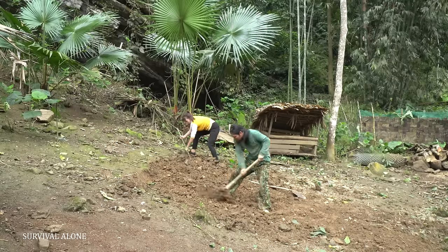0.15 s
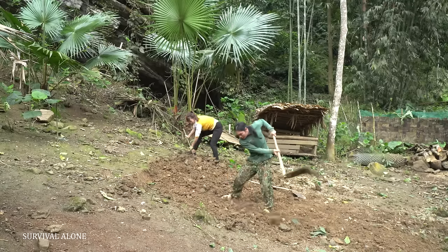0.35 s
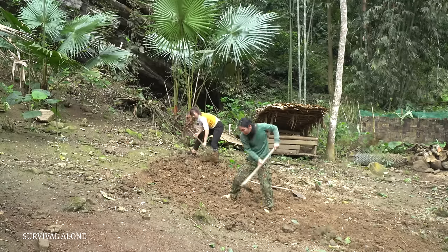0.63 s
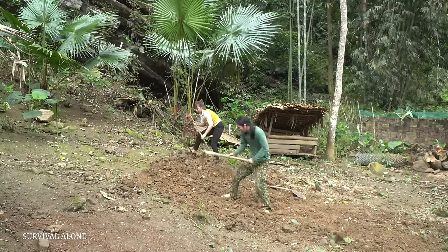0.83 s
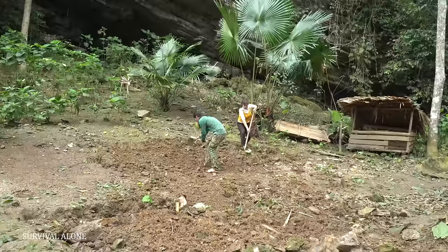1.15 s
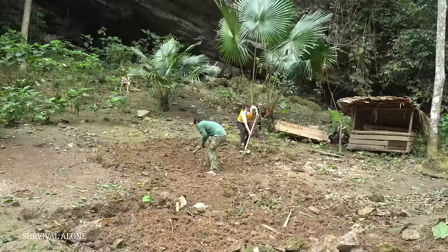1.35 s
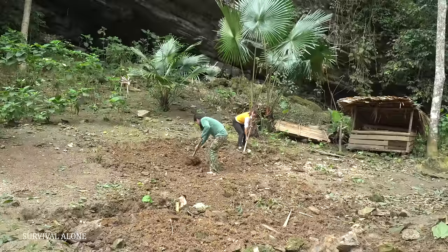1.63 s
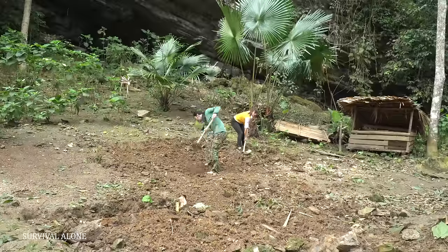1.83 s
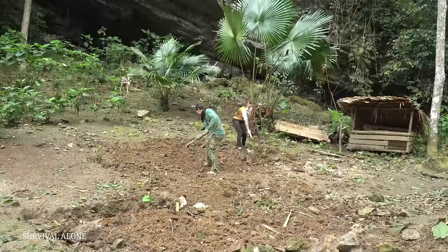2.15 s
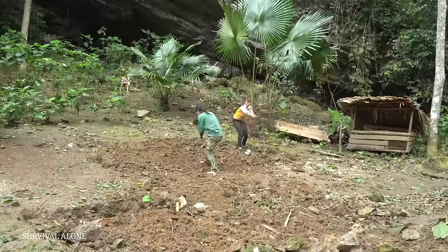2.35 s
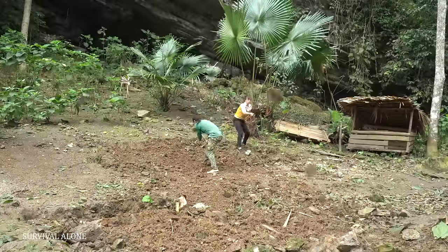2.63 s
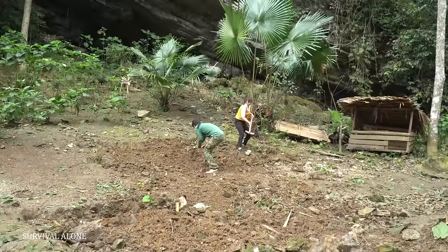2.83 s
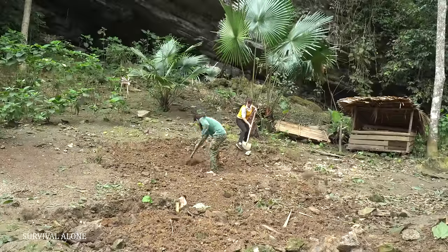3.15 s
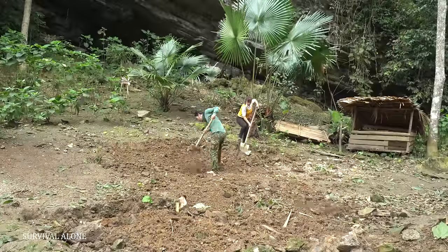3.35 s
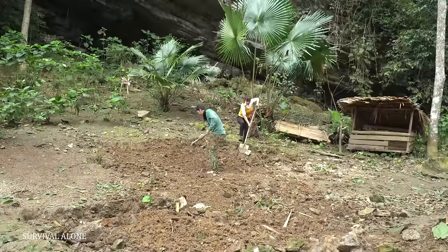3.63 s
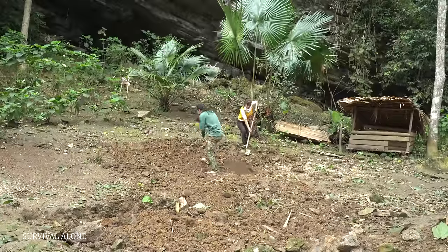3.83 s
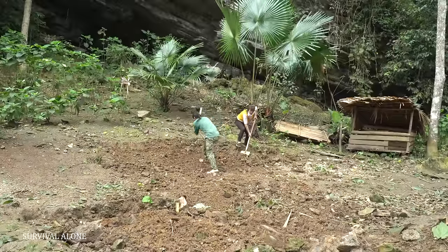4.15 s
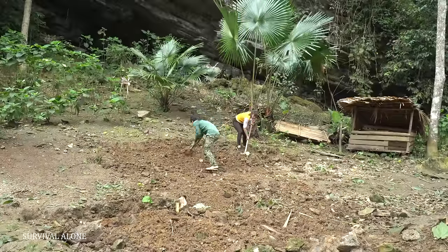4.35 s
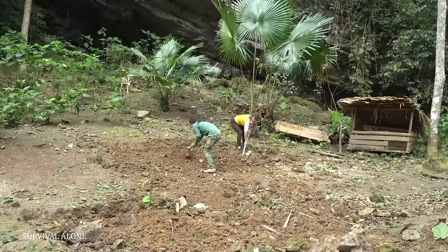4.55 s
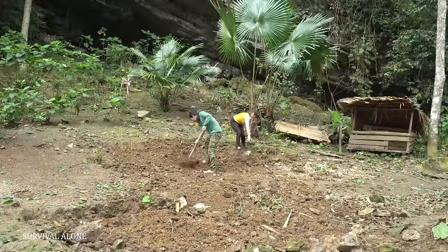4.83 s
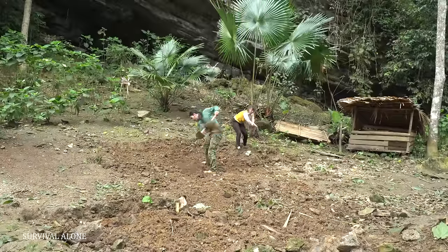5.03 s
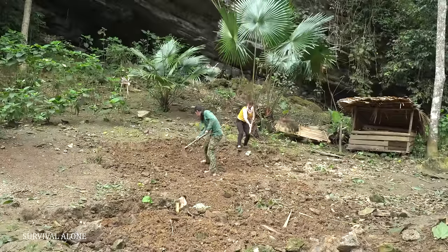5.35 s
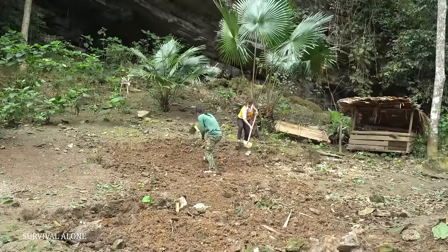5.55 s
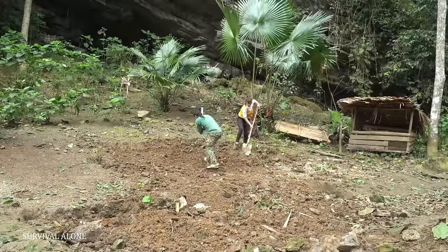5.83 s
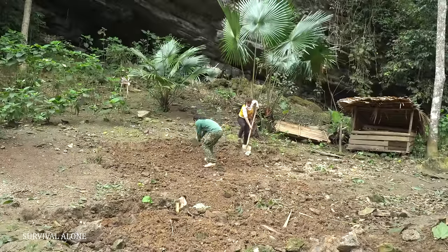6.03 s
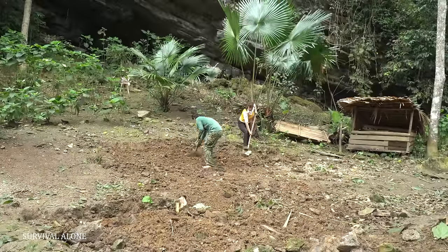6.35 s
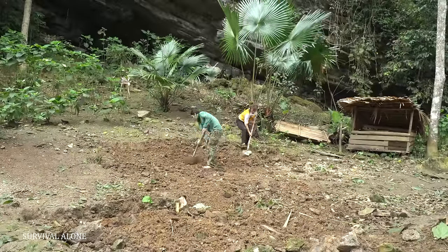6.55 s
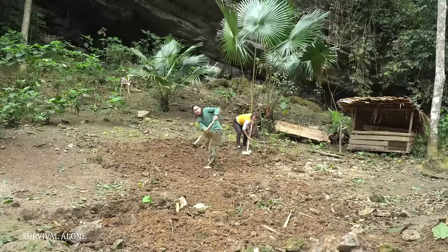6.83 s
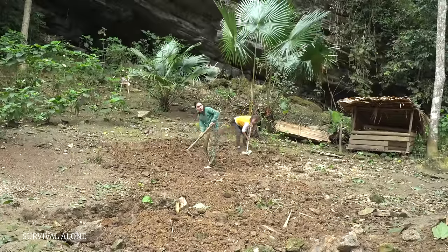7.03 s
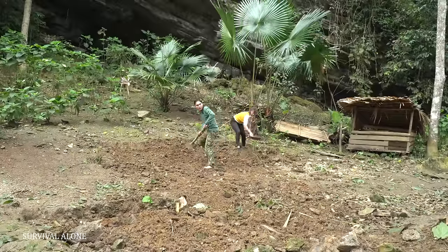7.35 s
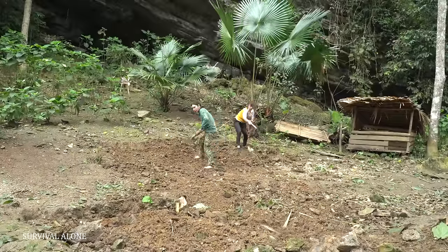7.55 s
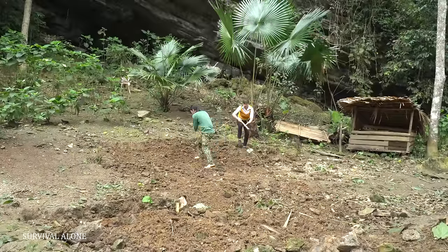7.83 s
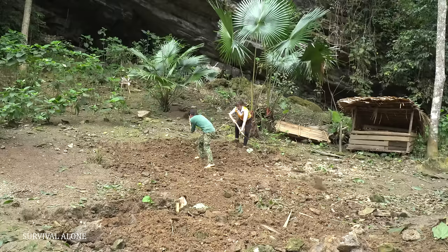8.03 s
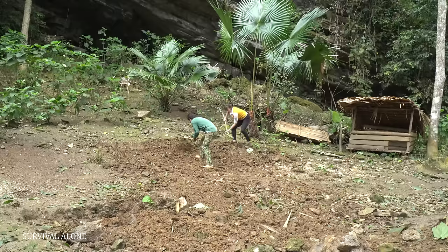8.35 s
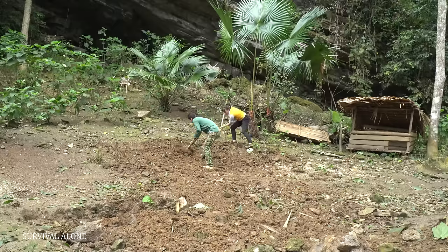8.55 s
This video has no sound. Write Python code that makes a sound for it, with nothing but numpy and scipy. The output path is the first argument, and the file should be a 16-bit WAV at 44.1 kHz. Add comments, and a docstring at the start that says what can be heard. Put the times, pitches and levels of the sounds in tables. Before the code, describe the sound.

Quick crunches open the scene, then looser strokes, dirt sweeps and pebble ticks. After a lull come hard bites with ringing steel, then a crowded flurry of crunches, stone knocks and a clear stone chime. It thins to trickling grit and faint hoe swishes before final blows. Sound is close and dry, left-heavy, hardest hits slightly clipped, with a faint rock echo and steady forest hiss.

```python
"""Two people hoe dry, stony ground in a forest clearing, over a steady, quiet forest hiss.
From the start blades crunch in (noise bursts) with dull tails (many tiny grains), and pebbles tick (snaps).
Soon earth is dragged and tossed, clods thud and stones knock (damped tones), and steel rings (modes).
A soft gust rumbles by early on; later a flat stone chimes, then swung hoes swish (wavering notes).
Trees and a rock face send back the strokes (filtered noise tails); stray grit trickles throughout."""
import sys
import numpy as np
from scipy import signal
from scipy.fft import rfft, irfft
from scipy.io import wavfile
from scipy.ndimage import uniform_filter1d

SR = 44100
rng = np.random.default_rng(int(sys.argv[2]) if len(sys.argv) > 2 else 0)


def dump(signal):
    """Clip the signal to [-1, 1] and save it as 16-bit WAV at the path in sys.argv[1]."""
    limited = np.clip(np.atleast_2d(signal).T, -1, 1)
    pcm = np.round(limited * 32767).astype(np.int16)
    wavfile.write(sys.argv[1], SR, pcm)


N = 383229  # length in samples

# In all tables level/dB is relative: the function that plays the table may add a gain to all its rows.


def amp(db):
    """Turns decibels into a gain."""
    return 10 ** (np.asarray(db) / 20)


def unit(x):
    """Scales a signal to an rms of 1."""
    return x / np.sqrt(np.mean(x ** 2) + 1e-20)


def read(points, hz):
    """Reads a spectrum between its points, on a log-frequency axis."""
    f, value = np.transpose(points)
    return np.interp(np.log(hz + 1), np.log(f), value)


def add(mix, s, sound):
    """Adds a sound into the mix from time s on."""
    part = mix[max(round(s * SR), 0):][:len(sound)]
    part += sound[:len(part)]


def bell(hz, centre_hz, octaves):
    """Gain of a broad hump that has halved this many octaves from its centre."""
    return 1 / (1 + (np.log2((hz + 1) / centre_hz) / octaves) ** 2)


def click(gain):
    """Makes the click that has a given spectrum and starts at once, with no sound before it."""
    both_sides = np.r_[gain, gain[-2:0:-1]]
    log_gain = np.log(np.maximum(both_sides, 1e-5))
    return np.fft.ifft(np.exp(np.conj(signal.hilbert(log_gain)))).real


def tint(x, points):
    """Colours a signal with a spectrum and scales it to an rms of 1."""
    taps = click(amp(read(points, np.fft.rfftfreq(2048, 1 / SR))))
    return unit(signal.oaconvolve(x, taps)[:N])


def stone(hz, centre_hz, octaves, ripple_db):
    """Spectrum of a struck stone: a broad hump with a few mild resonances of its own."""
    ripple = np.tanh(unit(uniform_filter1d(rng.standard_normal(len(hz)), size=9)))
    return bell(hz, centre_hz, octaves) * amp(ripple_db * ripple * bell(hz, centre_hz, 0.97))


# blade crunching into the ground: (t/s, level/dB, centre f/Hz, weight of soil level/dB, capped at 0)
CHOPS = [(0.078, -11, 2570, 3), (0.145, -14.5, 2250, -23), (0.195, -6.5, 2400, 2), (0.23, -5, 2700, -32),
         (0.247, -0.5, 3020, -36), (0.26, -7.5, 2930, -36), (1.32, -12, 3760, 4), (1.3822, -4, 1410, -9),
         (1.392, -4, 1420, 4), (1.522, -9.5, 2660, -19), (1.667, -5.5, 1600, -6), (1.779, -4, 2740, -4.5),
         (2.425, -13, 870, -4), (2.567, -8, 1710, -5), (2.688, -11.5, 2110, 3), (2.827, -4, 1220, -33),
         (2.879, -7.5, 2080, 0), (3.092, -12, 2570, 2), (3.145, -10, 1700, -40), (3.21, -5.5, 2380, -10),
         (3.382, -11, 5100, -2.5), (3.472, -14.5, 1660, -3), (4.389, -1, 1280, -23),
         (4.3885, -8.5, 6400, -28), (4.408, -4.5, 1400, -22), (4.696, -12.5, 1900, -3),
         (4.7916, -3, 2400, -29), (4.865, -11.5, 2720, -16), (5.059, -14, 2210, -31),
         (5.19, -12.5, 2860, -17), (5.365, -17.5, 1900, 2), (5.765, -1.5, 1160, -20), (5.87, -6, 2570, -4),
         (5.921, -5.5, 1020, -33), (5.981, -3, 1040, -31), (6.162, -0.5, 1560, 1), (6.31, -1.5, 1450, -4),
         (6.365, -6, 1480, -9), (6.416, -10.5, 1530, 3), (6.4405, -5, 900, -5), (6.474, -5.5, 3330, -5),
         (6.543, -9, 3530, -32), (6.652, -3, 2390, -13), (7.652, -11.5, 3500, -5), (8.242, -12, 2760, -22),
         (8.247, -0.5, 1580, -11.5), (8.529, -8, 2100, -7), (8.571, -14, 1070, -30)]


def chops(level_db=-5.5, rise_s=0.0023, t60_s=0.026, octaves=1.04, soil_hz=310, soil_db=2.0,
          crumble_db=-22, crumble_t60_s=0.37, muffle_hz=9200, uneven_db=4.0):
    """The edge bites, the crust breaks in a run of tiny fractures, then crumbles."""
    out, t = np.zeros(N), np.arange(8192) / SR
    hz = np.fft.rfftfreq(1024, 1 / SR)
    for s, db, centre_hz, weight_db in CHOPS:
        crack, crumble, size = rng.standard_normal((3, len(t)))
        envelope = np.clip(t / rise_s, 0, 1) ** 2 * amp(-60 * np.maximum(t - rise_s, 0) / t60_s)
        fractures = amp(uneven_db * unit(uniform_filter1d(size, size=24)))
        crumbs = amp(crumble_db - 60 * t / crumble_t60_s) * crumble * abs(size)
        burst = crack * envelope * fractures + crumbs
        muffle = np.hypot(1, (hz / muffle_hz) ** 2)  # earth soaks up the top
        crust = stone(hz, centre_hz, octaves, ripple_db=5) / muffle
        soil = amp(soil_db + min(weight_db, 0)) * bell(hz, soil_hz, 1)
        sound = signal.fftconvolve(burst, click(np.hypot(crust, soil)))
        loudness = np.linalg.norm(envelope) / np.linalg.norm(sound)
        add(out, s, amp(db + level_db) * sound * loudness)
    return out


def ring(modes, contact_hz, octaves, rub):
    """Decaying modes; the contact decides which speak most, and rubbing grit blurs their pitch."""
    t = np.arange(SR // 2) / SR
    hz, db, t60 = np.transpose(modes)[:, :, None]
    start = 2 * np.pi * rng.random(hz.shape)
    wander = np.cumsum(rng.standard_normal((len(modes), len(t))), axis=1)
    phase = start + rub * np.sqrt(hz / hz.mean()) * wander
    strength = amp(db - 60 * t / t60) * bell(hz, contact_hz, octaves)
    partials = strength * np.sin(2 * np.pi * hz * t + phase)
    return partials.sum(0) * (1 - np.exp(-t / 0.00013))  # very short soft start


# steel blade glancing off a stone:
# (t/s, level/dB, f/Hz that the contact favours, pitch factor from the load on the blade, how it rings)
CLANGS = [(1.78, -34, 2870, 0.9, "dull"), (4.39, -22.5, 7500, 0.97, "edge"),
          (4.794, -33.5, 2570, 1.0, "dull"), (5.059, -17.5, 1990, 0.98, "clear"),
          (6.653, -22.5, 3420, 1.0, "dull"), (8.251, -37, 5600, 0.85, "edge")]
# the blade's ringing modes for each way it rings: (f/Hz before the pitch factor, level/dB, t60/s)
BLADES = {"dull": [(1510, 3, .55), (2500, 1, .55), (2760, -1, .45), (3880, -3, .35), (4450, 1, .4),
          (6400, -3, .25)], "clear": [(1507, -1, .17), (2196, 3, .08), (3192, -4, .12), (3634, 2, .11)],
          "edge": [(6240, -4, .6), (7080, 0, .8), (8200, -4, .75), (9060, -7, .7)]}


def blades(level_db=-6):
    """The steel rings on after contact; grit on the blade roughens the note."""
    out, rub = np.zeros(N), {"dull": .09, "clear": .06, "edge": .17}
    for s, db, contact_hz, pitch, blade in CLANGS:
        modes = np.multiply(BLADES[blade], [pitch, 1, 1])
        add(out, s, amp(db + level_db) * ring(modes, contact_hz, octaves=1.0, rub=rub[blade]))
    return out


# a hard, flat stone is knocked about: (t/s, level/dB, f/Hz that the contact favours)
CHIMES = [(6.003, -3.5, 6060), (6.008, -9, 1400), (6.022, -14.5, 3560), (6.146, -16.5, 6860)]
# ringing modes of that stone: (f/Hz, level/dB, t60/s)
SLAB = [(1437, -2.5, 0.42), (3561, 3, 0.22), (6290, 0.5, 0.075), (6450, -14, 0.4), (9650, -6, 0.06)]


def slab(level_db=-4):
    """The flat stone chimes in its own modes each time it is knocked."""
    out = np.zeros(N)
    for s, db, contact_hz in CHIMES:
        add(out, s, amp(db + level_db) * ring(SLAB, contact_hz, octaves=0.4, rub=0.05))
    return out


# single pebbles snapping against each other: (t/s, level/dB, centre f/Hz)
PEBBLES = [(0.014, -4.5, 3300), (0.52, -13, 2540), (0.83, -11.5, 7900), (0.9075, -8, 4260),
           (0.926, -10.5, 4120), (0.944, -10, 5500), (1.009, -13.5, 3780), (1.199, -24, 3000),
           (1.437, -5.5, 3900), (1.53, -7.5, 3600), (1.551, -8.5, 3500), (1.715, -5, 4800),
           (2.167, -14, 8900), (2.171, -6.5, 3520), (2.274, -11, 1170), (2.285, -10.5, 3220),
           (2.3193, -15, 8900), (2.4257, -11, 7550), (2.55, -12, 3000), (2.576, -1, 5000),
           (2.79, -1.5, 5260), (2.817, -7, 3600), (2.8287, -3, 3030), (3.047, -4.5, 4750),
           (3.121, -9, 3000), (3.155, -6.5, 3580), (3.237, -7, 1910), (3.614, -16.5, 4460),
           (4.299, -13, 3600), (4.079, -14, 11000), (3.892, -3, 8500), (4.427, -6, 2600),
           (4.764, -10, 3500), (4.8317, -6, 4300), (5.202, -6, 5440), (5.609, -11, 6460),
           (5.896, -3.5, 2950), (6.091, -2.5, 4000), (7.383, -9, 3300), (7.536, -9.5, 7500),
           (7.564, -3.5, 4860), (7.604, -6, 3200), (8.1262, -12.5, 3360), (8.1859, -8, 3260),
           (8.471, -10, 1390)]


def pebbles(level_db=-5, octaves=1.38, chatter=0.094, chatter_t60_s=0.019):
    """One sharp snap with a brief chatter as the pebble settles; both stones colour it."""
    out, t, hz = np.zeros(N), np.arange(1500) / SR, np.fft.rfftfreq(1024, 1 / SR)
    for s, db, centre_hz in PEBBLES:
        snap = t == 0
        contact = snap + chatter * rng.standard_normal(len(t)) * amp(-60 * t / chatter_t60_s)
        two_stones = stone(hz, centre_hz, octaves, ripple_db=5.0) ** 2
        sound = signal.fftconvolve(contact, click(two_stones))
        add(out, s, amp(db + level_db) * sound / abs(sound).max())
    return out


def bumps(rows, rise_s, t60_s, sag, rough):
    """Damped bodies: a few cycles that sag in pitch, roughened by the earth that they press."""
    out, t = np.zeros(N), np.arange(SR // 4) / SR
    for s, db, hz in rows:
        # the pitch starts a little above hz and settles as far below it
        turns = np.cumsum(hz * (1 + sag * (np.exp(-t / rise_s / 3) - .5))) / SR
        spread = bell(np.fft.rfftfreq(len(t), 1 / SR), hz, 1.0) ** 2
        earth_noise = unit(irfft(rfft(rng.standard_normal(len(t))) * spread, len(t)))
        envelope = (1 - np.exp(-(t / rise_s) ** 2)) * amp(-60 * t / t60_s)
        body = np.sin(2 * np.pi * turns) + rough * earth_noise
        add(out, s, amp(db) * envelope / envelope.max() * body)
    return out


# stones rolling over the blade: (t/s, level/dB, middle f/Hz of the sagging pitch)
KNOCKS = [(1.176, -24, 986), (1.476, -24, 1174), (3.474, -20.5, 1308), (4.512, -19.5, 1020),
          (5.924, -20, 964), (5.961, -18.5, 952), (5.985, -14.5, 1012), (6.043, -16.5, 966),
          (6.058, -14, 796), (6.079, -13.5, 867), (6.089, -16, 953), (6.4415, -14, 867)]


def knocks():
    """Rolling stones knock and clink as short tones with hardly any sag."""
    return amp(4.0) * bumps(KNOCKS, rise_s=0.00035, t60_s=0.059, sag=0.0089, rough=0.31)


# heavy clods and boots landing: (t/s, level/dB, middle f/Hz of the sagging pitch)
THUDS = [(1.16, -45, 128), (1.39, -44, 128), (2.767, -30.5, 129), (3.338, -35.5, 127), (6.164, -31, 129),
         (7.221, -33, 135), (7.24, -35.5, 167), (7.255, -41, 91.5), (8.117, -39, 133), (8.19, -41.5, 228)]


def thuds():
    """Clods and boots thud as low tones that sag clearly, with much rough earth."""
    return amp(9.5) * bumps(THUDS, rise_s=0.0004, t60_s=0.12, sag=0.3, rough=0.91)


def grains(colour, per_s, spread_db, clump_db, wash):
    """Countless small impacts of uneven size, falling in clumps over a smooth rustle."""
    size = amp(spread_db * np.minimum(rng.exponential(1, N), 3.6))
    impacts = size * rng.choice([-1., 1.], N) * (rng.random(N) < per_s / SR)
    slow_noise = uniform_filter1d(uniform_filter1d(rng.standard_normal(N), size=400), size=200)
    clumps = amp(clump_db * unit(slow_noise))
    return tint((unit(impacts) + wash * rng.standard_normal(N)) * clumps, colour)


def gravel(per_s=160, spread_db=4.5, cycles=2.7, low_hz=900, high_hz=7500):
    """Small pings of many pitches, like stones of many sizes colliding."""
    out, t = np.zeros(N), np.arange(1024) / SR
    chance = rng.random((N // 100, 3))  # one row for each short time slot
    for slot in np.flatnonzero(chance[:, 0] < per_s * N / SR / len(chance)):
        _, size, pitch = chance[slot]
        hz = low_hz * (high_hz / low_hz) ** pitch
        ping = np.sin(2 * np.pi * hz * t) * np.exp(-t * hz / cycles) * hz ** (1 / 4)
        gain = amp(spread_db * min(-np.log(size), 3))
        add(out, slot / len(chance) * N / SR, gain * ping)
    return unit(out)


def surge(peak_s, swell_s, t60):
    """A power envelope that swells smoothly to 1 and then dies away."""
    out, lead = np.zeros(N), min(np.pi * swell_s, peak_s)
    t = np.arange(-lead, t60, 1 / SR)
    level = np.where(t < 0, np.exp(-(t / swell_s) ** 2), amp(-60 * t / t60))
    add(out, peak_s - lead, level ** 2)
    return out


def clustering(per_s=90, burst_s=0.0021, share=0.71):
    """At random moments the power gathers into bursts a few milliseconds long."""
    t = np.arange(1024) / SR
    starts = 1. * (rng.random(N) < per_s / SR)
    bursts = abs(signal.oaconvolve(starts, t * np.exp(-t / burst_s))[:N])
    return 1 - share + share * bursts / bursts.mean()


# colour of each grain size, from coarse to fine: (f/Hz, level/dB)
CRUMBS = [(35, -23), (95, -5), (300, 0), (600, -1.5), (1050, 2.5), (1500, -1.5), (2600, -52)]
GRIT = [(600, -7.5), (1400, 4.5), (2600, 7), (4200, 4), (6000, -6), (10000, -22)]
DUST = [(3000, 2.5), (6800, 6.5), (9000, 2), (12000, 0), (16000, -8)]


def texture(rows, lumpy, gravel_db=-5.5):
    """Four layers of grains, even or lumpy: crumbs patter, gravel clinks, grit crackles, dust fizzes."""
    flow, coarse, fine = np.zeros((3, N))  # powers of overlapping rows add
    for s, swell_s, db, t60, coarse_db, dust_db in rows:
        power = amp(db) ** 2 * surge(s, swell_s, t60)
        flow += power
        coarse += power * amp(coarse_db) ** 2
        fine += power * amp(dust_db) ** 2
    crumbs = grains(CRUMBS, per_s=450, spread_db=3.0, clump_db=2.8 * lumpy, wash=.5 / lumpy)
    grit = grains(GRIT, per_s=900, spread_db=3.8, clump_db=1.9 * lumpy, wash=.5 / lumpy)
    dust = grains(DUST, per_s=2200, spread_db=3.6, clump_db=1.6 * lumpy, wash=.65 / lumpy)
    mix = np.sqrt(coarse) * (crumbs + amp(gravel_db) * gravel())
    mix += np.sqrt(flow) * grit + np.sqrt(fine) * dust
    return mix * unit(np.sqrt(clustering()) ** lumpy)


# dense, dull tails after hard bites, thrown back by the surroundings:
# (t/s, level/dB, t60/s, coarse layer against middle layer level/dB)
TAILS = [(0, -29.5, 0.88, -7.5), (0.239, -29.5, 0.24, -3.5), (1.508, -29.5, 0.75, -4.5),
         (1.78, -39.5, 1, -9), (2.828, -23, 0.4, -17), (3.481, -34, 0.28, -3.5), (4.405, -25.5, 1.2, -5),
         (4.799, -31.5, 0.77, -11.5), (5.9, -35.5, 1.7, 3.5), (6.16, -29.5, 1.7, -2.5),
         (6.47, -33.5, 1.02, 1), (7.655, -39.5, 0.35, -2), (8.257, -33, 1.22, -3),
         (8.551, -36.5, 0.56, 2.5)]


def tails(rise_s=0.0012, dust_db=-10.5):
    """A sudden, even hiss that dies away after a stroke, made of dense grains with little lumpiness."""
    rows = [(s + rise_s, rise_s, db, t60, coarse_db, dust_db) for s, db, t60, coarse_db in TAILS]
    return texture(rows, lumpy=.5)


# earth dragged by the blade or tossed to the ground: (t/s at its height, swell/s, level/dB, t60/s,
# coarse crumbs against grit level/dB, fine dust against grit level/dB)
SWEEPS = [(.48, 0.096, -41.5, 0.81, 5, 4), (.77, 0.42, -41.5, 4, -1, 0),
          (1.15, 0.038, -31.5, 1.14, 0.5, 2.5), (1.39, 0.07, -30, 0.44, -0.5, 2.5),
          (2.55, 0.039, -25.5, 0.17, -2.5, -1), (2.65, 0.043, -43.5, 4.5, 1.5, 2.5),
          (2.84, 0.045, -27.5, 0.37, -6.5, 3.5), (3.12, 0.2, -34.5, 1.5, -2, -5.5),
          (3.35, 0.066, -31.5, 0.31, -1, 0.5), (3.848, 0.0083, -27, 0.12, -6, 5),
          (3.925, 0.098, -33, 0.48, 0, 3.5), (4.127, 0.012, -32, 0.37, -5, 1.5),
          (5.79, 0.068, -34.5, 1.2, 1.5, 3.5), (6.07, 0.037, -30.5, 0.57, 4, -3),
          (6.43, 0.046, -24, 0.094, -6, -2), (6.917, 0.015, -36, 0.089, 2.5, -4),
          (7.4, 0.19, -44.5, 1.9, -2.5, 1), (7.57, 0.049, -37, 0.35, 1, 2),
          (8.17, 0.047, -42, 0.18, 4, 1.5)]


def sweeps():
    """Dragged or tossed earth swells and dies away, lumpy and dusty."""
    return texture(SWEEPS, lumpy=1)


# air rushing round a swung hoe: (t/s at which the swing ends, length/s, level/dB, starting f/Hz)
SWINGS = [(6.934, 0.068, -50, 430), (7.24, 0.083, -41, 366.5), (8.095, 0.23, -50, 489)]


def swish(width_hz=90, sag=0.286, build_db=11, fade_s=0.0268):
    """Eddies behind the handle sing a soft, breathy note that builds and falls in pitch as the swing ends."""
    out, r = np.zeros(N), np.exp(-np.pi * width_hz / SR)
    for end, length, db, hz in SWINGS:
        t = np.arange(0, length + fade_s, 1 / SR)
        progress = np.minimum(t / length, 1)
        noise = rng.standard_normal(SR) + 1j * rng.standard_normal(SR)
        eddies = signal.lfilter([1], [1, -2 * r, r * r], noise)[-len(t):]
        turns = np.cumsum(hz * (1 - sag * progress ** 5)) / SR
        note = unit((eddies * np.exp(2j * np.pi * turns)).real)
        fades = np.clip(np.minimum(t, t[-1] - t) / fade_s, 0, 1)
        flutter = unit(abs(eddies[::-1]))  # the eddies form and break up
        add(out, end - length, amp(db + build_db * (progress - 0.5)) * fades * flutter * note)
    return out


def rock_face(x, delay_s=0.0972, t60_s=0.092):
    """The overhang behind the diggers returns each stroke as one blurred echo."""
    t = np.arange(SR // 2) / SR
    late = np.maximum(t - delay_s, 0)
    taps = rng.standard_normal(len(t)) * np.sqrt(late) * amp(-60 * late / t60_s)
    return signal.fftconvolve(x, taps / np.linalg.norm(taps))[:N]


def clearing(x, per_s=2500, t60_s=1):
    """The trees scatter a thin tail, cut off after half a second."""
    t = np.arange(SR // 2) / SR
    tail = rng.standard_normal(len(t)) * (rng.random(len(t)) < per_s / SR) * amp(-60 * t / t60_s)
    delay = np.zeros(300)
    return signal.fftconvolve(x, np.r_[delay, tail / np.linalg.norm(tail)])[:N]


def stray_grit():
    """Single grains keep dropping onto dry leaves throughout."""
    return amp(-55) * grains(DUST, per_s=45, spread_db=4.5, clump_db=1.0, wash=0)


def wind(corner_hz=70, peak_s=2.2, width_s=0.81, level_db=-50.5):
    """A faint low rumble swells and fades as one soft gust passes."""
    gust = np.exp(-((np.arange(N) / SR - peak_s) / width_s) ** 2)
    lowpass = signal.butter(2, corner_hz, fs=SR, output="sos")
    rumble = unit(signal.sosfilt(lowpass, rng.standard_normal(N)))
    return amp(level_db) * gust * rumble


# colour of the forest hiss: (f/Hz, level/dB)
FOREST = [(25, -7), (60, -3.5), (150, 3), (400, -4.5), (1000, -1), (5000, -10), (16000, -14)]


def forest_hiss():
    """Steady coloured noise, separate on each side so that it sounds wide."""
    return amp(-47.0) * np.array([tint(rng.standard_normal(N), FOREST) for _ in range(2)])


def scene(left_db=10):
    """All the digging reaches one point, louder on the left; the forest hiss is wide."""
    bites, steel, dull_tails = chops(), blades(), tails()
    blows = bites + steel + slab() + pebbles() + knocks() + thuds()
    echoes = rock_face(amp(-19) * bites + amp(-5) * steel + amp(-9) * dull_tails)
    echoes += amp(-15) * clearing(blows)
    work = blows + dull_tails + sweeps() + swish() + echoes + stray_grit() + wind()
    sides = amp([[left_db], [0]])  # left, right
    return work * sides / sides.mean() + forest_hiss()


def record(dry, edge_hz=16000):
    """Peaks beyond full scale overload the input and are cut flat; then the top of the band is cut."""
    clipped = np.clip(dry, -1, 1)
    lowpass = signal.firwin(401, edge_hz, window=("kaiser", 8), fs=SR)
    return signal.oaconvolve(clipped, lowpass[None], "same")


dry = scene()
out = record(dry)
dump(out)
```